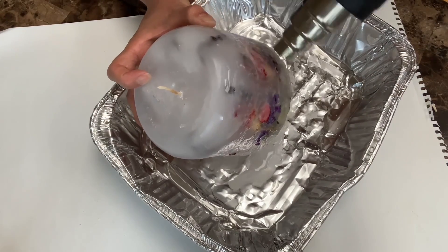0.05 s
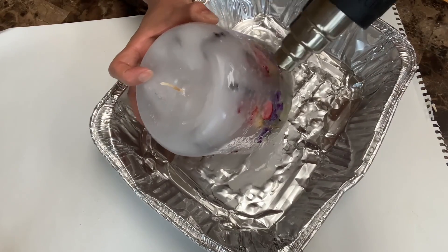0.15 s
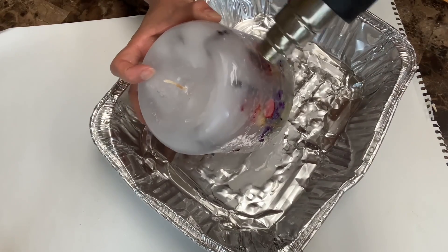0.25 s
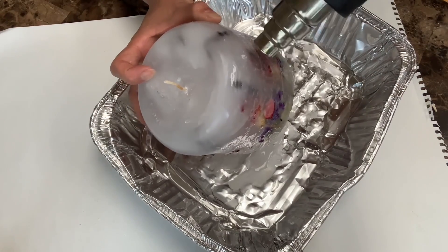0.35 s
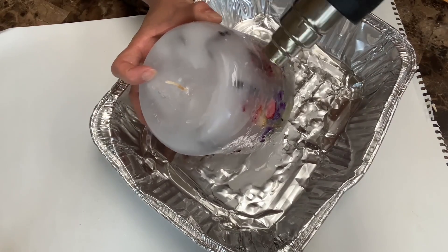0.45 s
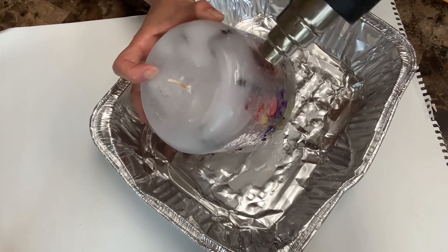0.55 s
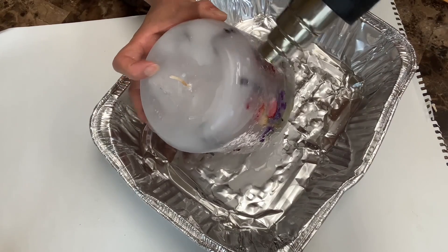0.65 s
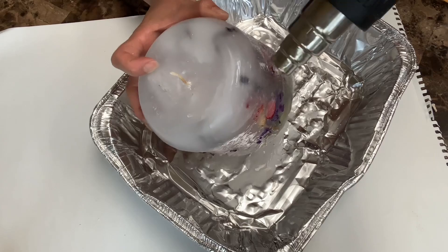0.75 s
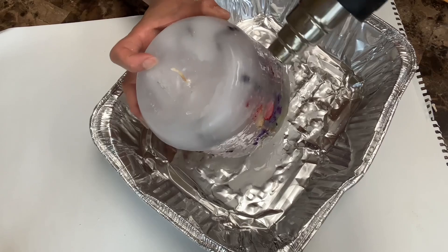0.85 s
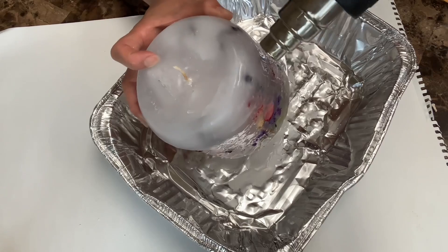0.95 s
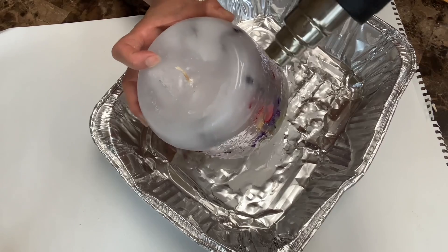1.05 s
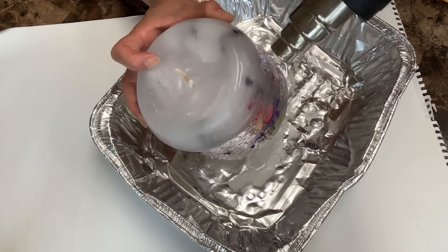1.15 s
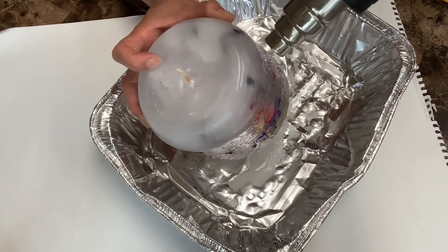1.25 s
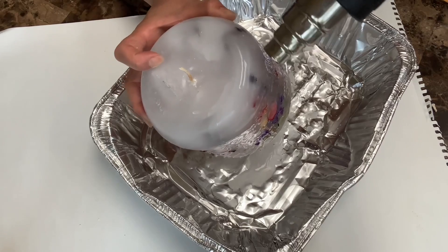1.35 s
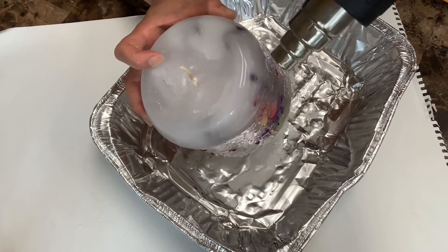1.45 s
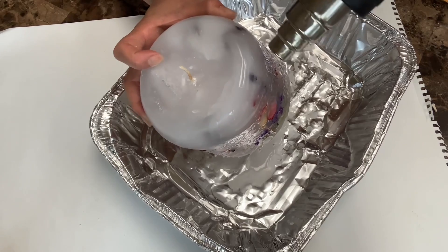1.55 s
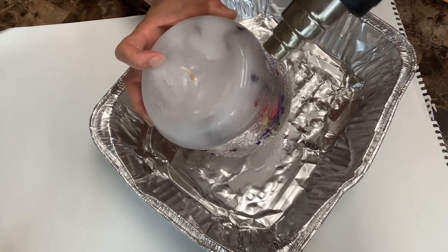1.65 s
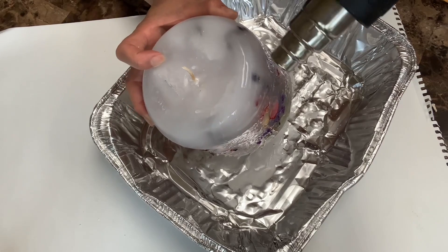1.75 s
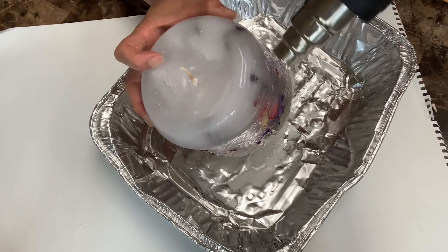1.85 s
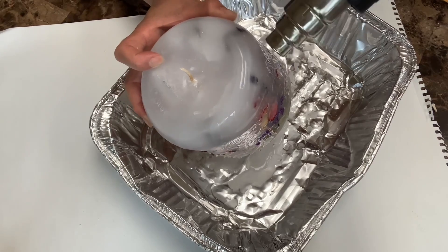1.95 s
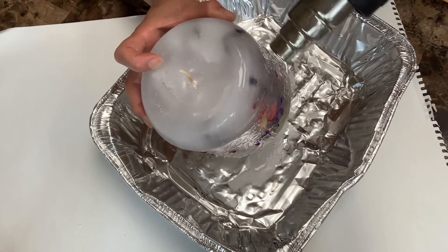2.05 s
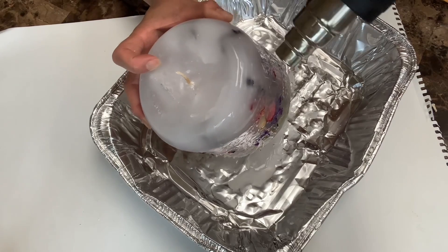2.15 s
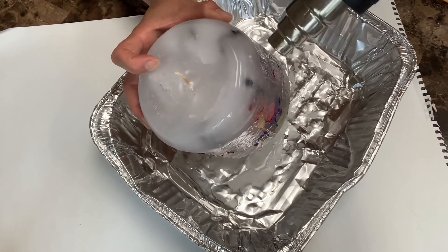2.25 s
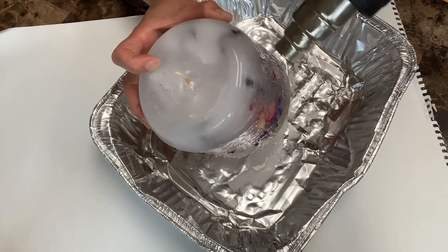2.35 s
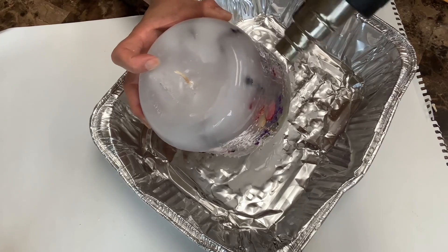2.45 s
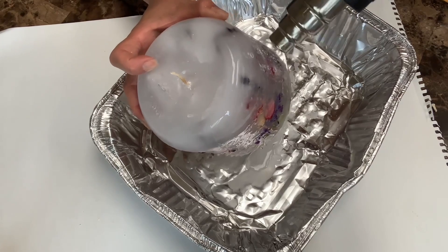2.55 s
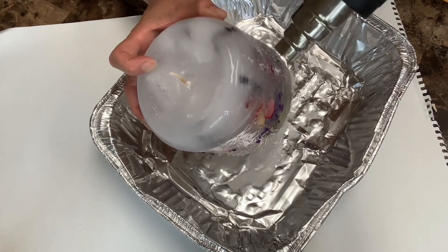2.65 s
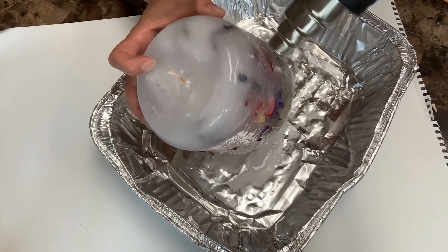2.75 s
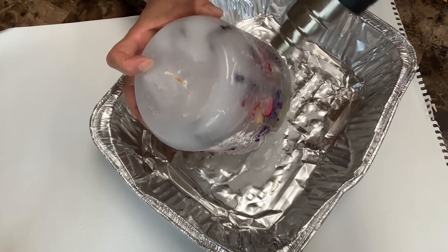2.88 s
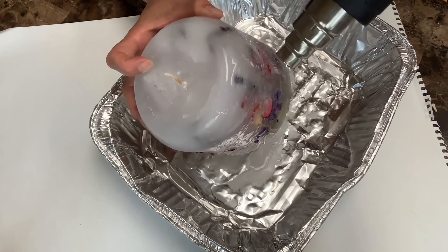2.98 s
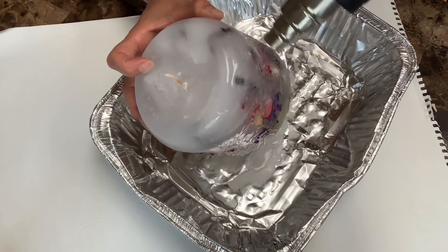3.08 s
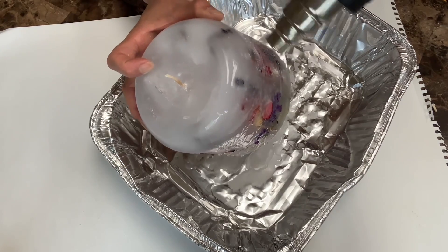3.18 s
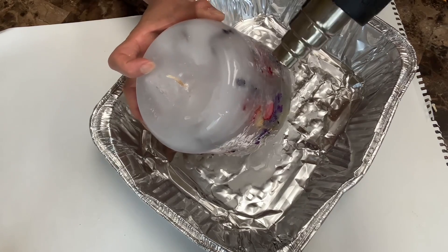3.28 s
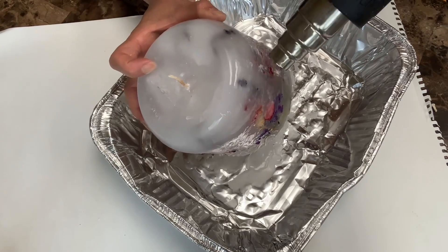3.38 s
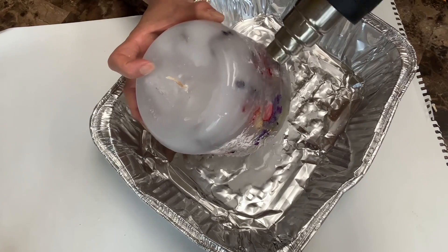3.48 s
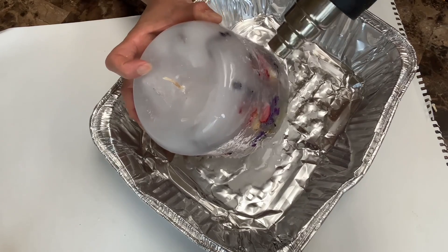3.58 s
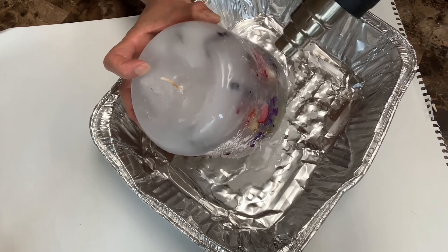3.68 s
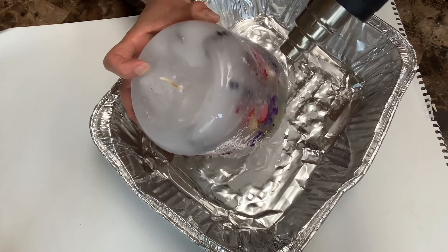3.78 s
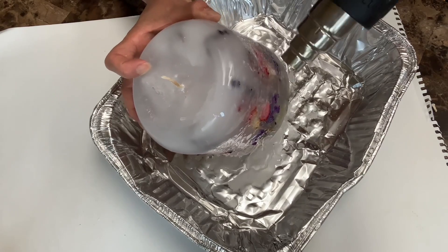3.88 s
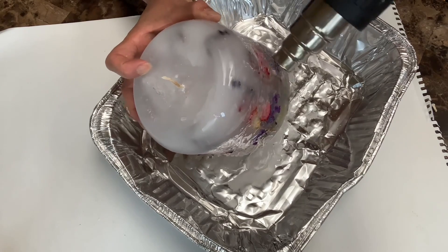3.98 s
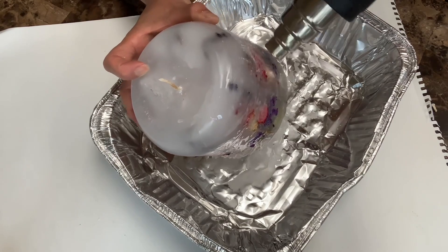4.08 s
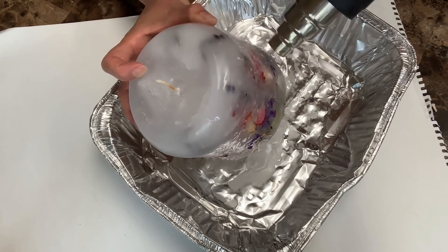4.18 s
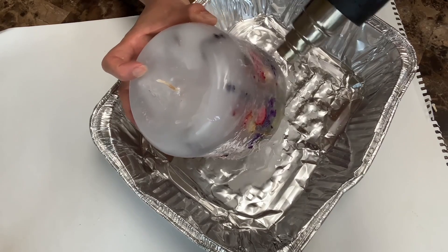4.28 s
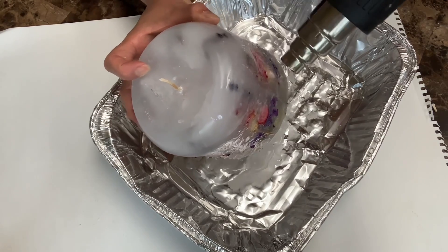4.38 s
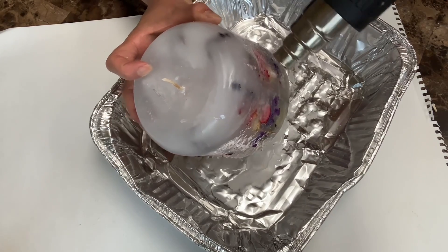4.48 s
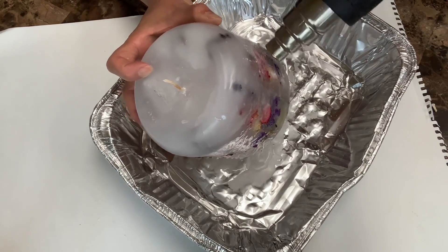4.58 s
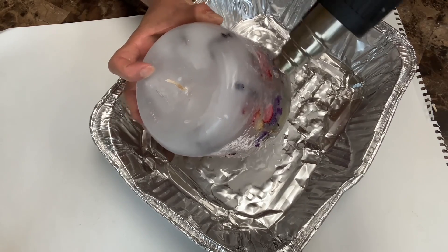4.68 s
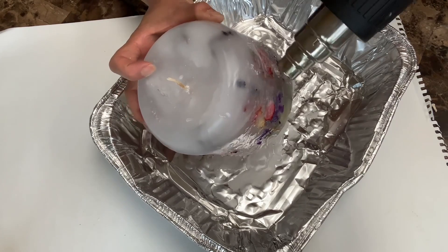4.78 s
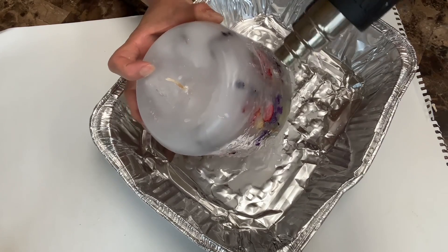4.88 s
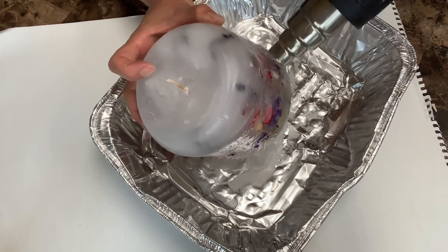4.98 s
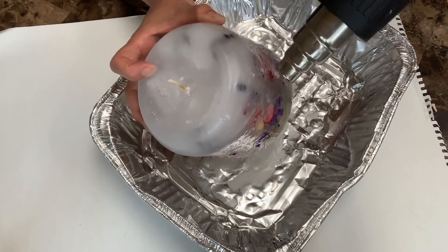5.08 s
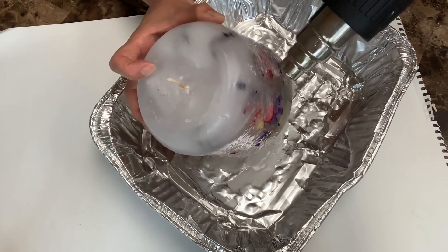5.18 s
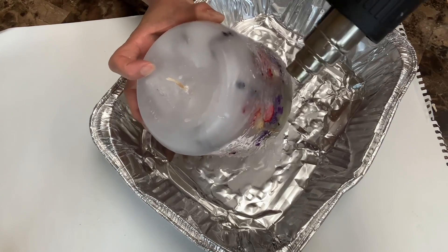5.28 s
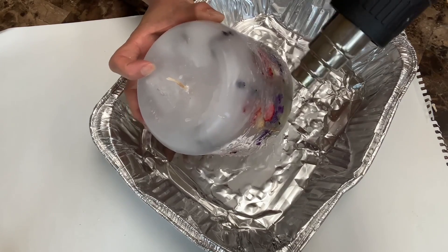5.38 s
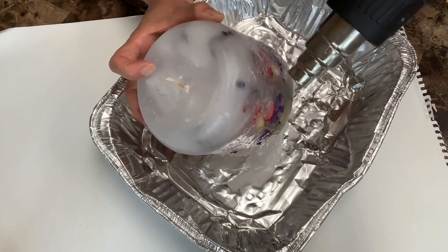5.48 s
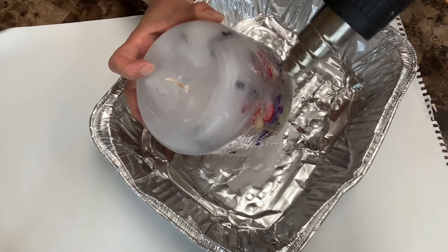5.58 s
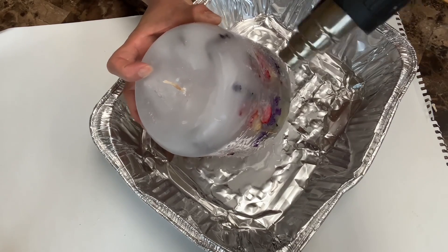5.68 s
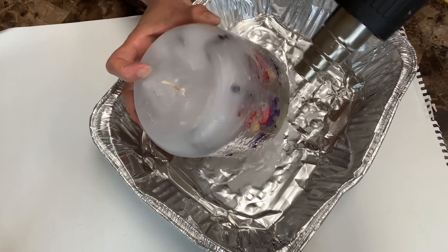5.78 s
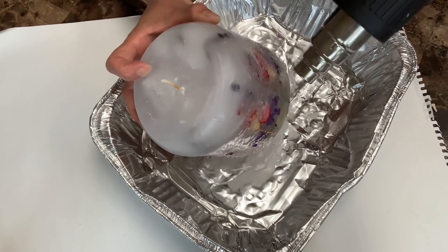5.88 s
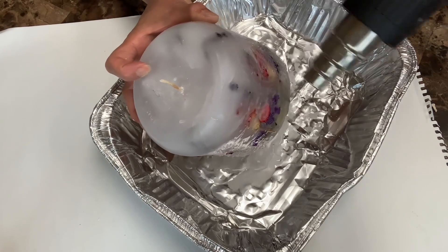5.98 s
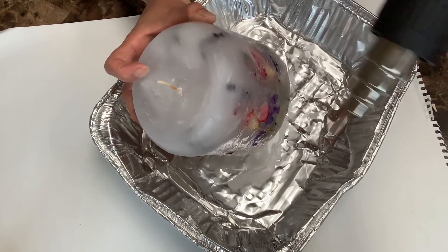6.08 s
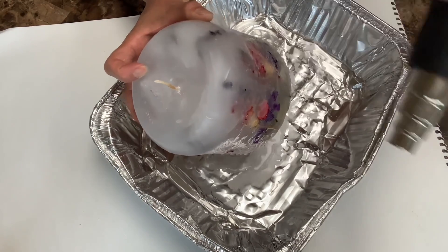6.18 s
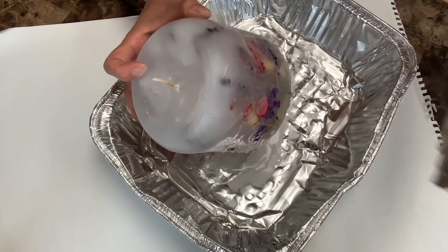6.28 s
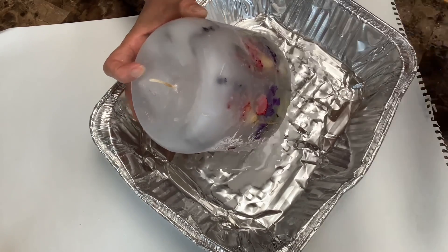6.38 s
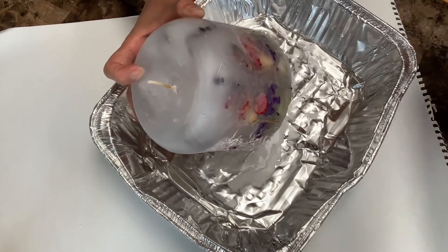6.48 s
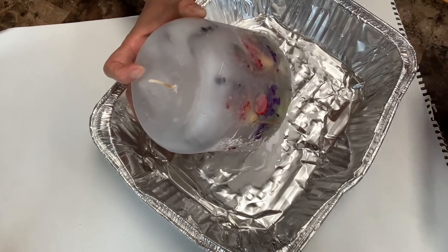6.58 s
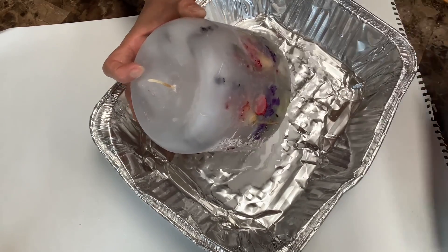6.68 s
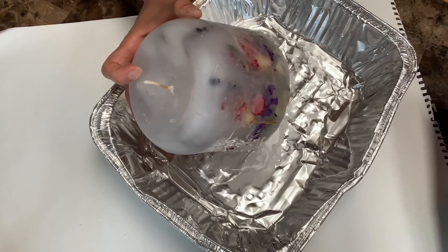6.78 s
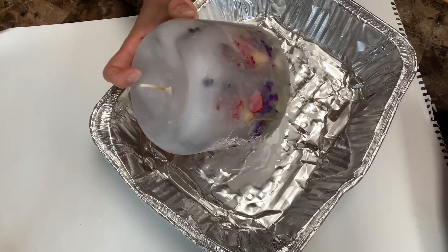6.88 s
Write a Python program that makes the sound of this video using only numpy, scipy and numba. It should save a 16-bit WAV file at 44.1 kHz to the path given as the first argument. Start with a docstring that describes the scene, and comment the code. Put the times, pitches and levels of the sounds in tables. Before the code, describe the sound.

A handheld heat gun runs close by in a quiet room, a steady rush of air with a motor hum and thin high whine. The tone of the rush shifts slightly as it is waved over a foil tray. After about five seconds the switch clicks off, and the fan coasts down with a falling, fading whine, growing quieter as the gun is moved aside.

```python
"""A heat gun's fan drives turbulent air through its barrel, waved at a candle over a foil tray.
Barrel resonances and the tray's echo colour the rush; the motor whines on harmonics of the shaft speed.
The switch clicks, drag slows the shaft and the gun is put aside with a faint rumble.
Low hums sound while the power is on; a quiet room lies behind. A phone listens half a metre away."""
import sys
import numpy as np
from scipy import signal
from scipy.fft import rfft, irfft
from scipy.io import wavfile
from scipy.ndimage import uniform_filter1d
from numba import njit

SR = 44100
rng = np.random.default_rng(int(sys.argv[2]) if len(sys.argv) > 2 else 0)


def dump(signal):
    """Clip the signal to [-1, 1] and save it as 16-bit WAV at the path in sys.argv[1]."""
    limited = np.clip(np.atleast_2d(signal).T, -1, 1)
    pcm = np.round(limited * 32767).astype(np.int16)
    wavfile.write(sys.argv[1], SR, pcm)


N = 305613
HOP = 128  # samples per control step
FULL_SPEED_HZ, TOP_HZ = 233.4, 15740


def undb(db):
    """Amplitude ratio of a level."""
    return 10 ** (np.asarray(db) / 20)


def curve(table, t, column=1):
    """Linear interpolation in time."""
    rows = np.array(table, float)
    return np.interp(t, rows[:, 0], rows[:, column])


def on_log(table, hz, column=1):
    """Interpolation in log frequency."""
    rows = np.array(table, float)
    return np.interp(np.log(np.maximum(hz, 1)), np.log(rows[:, 0]), rows[:, column])


def peak(hz, centre, width):
    """Lorentzian resonance curve; width is taken at half height."""
    return 1 / (1 + (2 * (hz - centre) / width) ** 2)


def walk(rows, steps, rate_hz):
    """Smoothed Gaussian noise of unit spread, one value per control step."""
    size = max(int(SR / HOP / rate_hz), 1)
    slow = rng.standard_normal((rows, steps + 4 * size))
    slow = uniform_filter1d(uniform_filter1d(slow, size), size)
    return slow[:, 2 * size:2 * size + steps] * np.sqrt(1.5 * size)


def coloured(gain_db):
    """Time-varying filtering of two independent noises by gain_db(hz, t)."""
    frames = dict(fs=SR, nperseg=8 * HOP, noverlap=6 * HOP)
    hz, t, spectra = signal.stft(rng.standard_normal((2, N)), **frames)
    return signal.istft(spectra * undb(gain_db(hz[:, None], t)), **frames)[1][:, :N]


@njit
def harmonic_sum(angle, amplitude, count, hop):
    """Fourier series in the shaft angle; complex amplitudes glide between control steps."""
    out = np.zeros((2, len(angle)))
    for i in range(len(angle)):
        step, u = i // hop, (i % hop) / hop
        turn = np.exp(1j * angle[i])
        phasor = turn
        for k in range(count[step]):
            for c in range(2):
                blend = amplitude[c, step, k] * (1 - u) + amplitude[c, step + 1, k] * u
                out[c, i] += (blend * phasor).imag
            phasor *= turn
    return out


# Shaft rotation under power: t/s, f/Hz
POWERED_SPEED = [(0, 232.8), (.36, 232.8), (.69, 233.7), (.9, 233.3), (2.04, 233.4), (2.6, 232.9),
                 (3.45, 233.8), (3.99, 233.8), (4.14, 232.9), (4.63, 234.2), (5.405, 233.8)]
OFF_S = POWERED_SPEED[-1][0]

def speed(t, step_s=.005):
    """Shaft rate in Hz: held by the motor, then slowed by dry friction, viscous oil and air drag."""
    rows = list(POWERED_SPEED)
    while rows[-1][0] < N / SR + .1:
        at, hz = rows[-1]
        drag = 49.7 + .4565 * hz + .002144 * hz ** 2
        rows.append((at + step_s, hz - step_s * drag))
    return curve(rows, t)


def away_db(t, at_s=6.45, takes_s=.11):
    """Level falls with distance as the gun is put aside."""
    return -7.5 * np.clip((t - at_s) / takes_s + .5, 0, 1)


# Turbulence spectrum at full speed: f/Hz, relative level/dB
RUSH_SPECTRUM = [(30, -27), (100, -6), (400, -5.5), (800, 7), (1500, 6), (2500, 2), (4000, -1.5),
                 (6000, -8.5), (7000, -12.5), (9000, -17), (11000, -10), (13000, -25), (15500, -33)]
# Barrel resonances: f/Hz, width/Hz, gain/dB
BARREL_MODES = [(129, 420, 3.5), (560.3, 5.6, 7), (646, 30, 2), (755, 68.5, 12.5), (857, 35, 1),
                (893, 55, 7), (1490, 43, 8), (1720, 5.6, 9), (2110, 93, 5.5)]
# Colour set by the aim: t/s, 4 kHz jet hiss/dB, 1.5 kHz ring/dB, 2.1 kHz ring/dB
AIM_COLOUR = [(0, 0.5, 1.5, 1), (.5, -0.5, 0.5, 5.5), (.9, -0.5, -0.5, 4), (1.5, 0, 0.5, 5.5),
              (2.4, -0.5, 1, 0.5), (3.1, -1.5, 2, 0.5), (3.5, -1, 0.5, 2.5), (3.75, 1, 3, -1.5),
              (4.0, -0.5, -1, 7), (4.15, -2, 3, 2), (4.3, 1, 1.5, -0.5), (4.55, 0, 1, 3.5),
              (4.8, -0.5, -1, 4), (5.35, 0.5, 3, 1), (5.8, 3.5, 4.5, 3.5), (6.15, 4.5, 4, 7),
              (6.4, 13, 6, -4), (6.6, 27, 6, 5), (6.93, 26, -2, 0)]
# Destructive interference with the tray's echo: t/s, lower f/Hz, depth/dB, upper f/Hz, depth/dB
TRAY_NOTCHES = [(0, 1920, -1, 2620, -1.5), (.7, 1900, 11, 2300, 6.5), (2.2, 1840, 2, 2260, 5.5),
                (2.6, 1890, 10, 2630, 0), (3.3, 1930, 6, 2700, 2), (3.8, 2080, 20, 2780, 7),
                (4.6, 2050, 12, 2840, 3), (5.2, 2000, 7, 2780, 1.5), (5.7, 1890, 6, 2780, -1)]
# Bands that fade more slowly: f/Hz, width/Hz, level spared/(dB per decade of speed)
LINGERING_BANDS = [(1020, 190, 15), (5140, 1350, 24)]

def rush(gain_db=-32, db_per_decade=47.5, darken_db=5., flicker_db=1.2, patch_db=2.4):
    """Turbulent noise filtered by the barrel; it follows a power law of fan speed, treble fading first."""
    def colour(hz, t):
        ratio = speed(t) / FULL_SPEED_HZ
        db = on_log(RUSH_SPECTRUM, hz) + sum(g * peak(hz, f, w) for f, w, g in BARREL_MODES)
        db = db + darken_db * np.log2(np.clip(hz, 300, 5000) / 900) * np.log2(ratio)
        db += curve(AIM_COLOUR, t) * np.exp(-np.log2(np.maximum(hz, 1) / 4000) ** 2)
        db += curve(AIM_COLOUR, t, 2) * peak(hz, 1500, width=500)
        db += curve(AIM_COLOUR, t, 3) * peak(hz, 2100, width=400)
        for column, width_hz in ((1, 90), (3, 230)):
            notch = peak(hz, curve(TRAY_NOTCHES, t, column), width_hz)
            db -= curve(TRAY_NOTCHES, t, column + 1) * notch
        spared = sum(g * peak(hz, f, w) for f, w, g in LINGERING_BANDS)
        db += (db_per_decade - spared) * np.log10(ratio)
        # neighbouring third-octaves swell together as the jet moves over the tray
        third = (3 * np.log2(np.maximum(hz[:, 0], 20) / 20)).astype(int)
        db += flicker_db * uniform_filter1d(walk(third.max() + 1, len(t), 7), size=2, axis=0)[third]
        # narrow patches of the treble swell and fade
        patch = (hz[:, 0] / 170).astype(int)
        db += patch_db * np.clip(hz / 2500 - .5, 0, 1) * walk(patch.max() + 1, len(t), 8)[patch]
        return db + gain_db + away_db(t)
    return coloured(colour)


# Spectral envelope of the housing: f/Hz, level/dB
HOUSING_SPECTRUM = [(200, -85), (800, -63), (1500, -66), (3000, -71), (5500, -77), (6200, -64), (6600, -59),
                    (7000, -57), (7400, -59), (7700, -63), (8500, -62), (9800, -58), (10700, -57),
                    (12000, -61), (14000, -65), (16000, -72)]
# Motor and blade tones at full speed: harmonic number, level/dB
SHAFT_HARMONICS = [(1, -49), (4, -58), (8, -59), (12, -57), (13, -57), (16, -62), (17, -65), (20, -60),
                   (23, -69), (25, -70), (27, -60), (29, -63), (32, -62), (33, -52), (34, -61), (35, -54),
                   (36, -61), (37, -61), (38, -54), (39, -57), (40, -61), (41, -58), (42, -55), (43, -58),
                   (44, -54), (45, -56), (46, -58), (47, -60), (48, -54), (49, -63), (50, -61), (51, -58),
                   (52, -53), (53, -57), (54, -61), (55, -60), (56, -61), (57, -64), (58, -57), (59, -61),
                   (60, -56), (61, -63), (62, -68), (63, -69), (64, -67), (65, -65), (66, -67), (67, -68)]
# Tones that vary with the aim: {harmonic number: (t/s, level/dB)}
AIMED_HARMONICS = {5: [(0, -45), (1.1, -46), (1.75, -47.5), (2.95, -44), (3.4, -47), (4.1, -43), (4.7, -51),
                   (5.4, -48)], 14: [(0, -52), (1.0, -51), (2.1, -50.5), (3.5, -56.5), (4.4, -55.5),
                   (5.4, -53.5)], 18: [(0, -47.5), (1.36, -48), (2.25, -49.5), (2.65, -47.5), (3.5, -51.5),
                   (4.0, -57), (4.28, -46), (4.55, -56), (4.7, -48), (4.95, -54), (5.12, -51), (5.4, -58)],
                   28: [(0, -59), (2.3, -71), (2.7, -53.5), (3.4, -48), (3.8, -63), (5.4, -60)],
                   31: [(0, -53.5), (2.5, -53.5), (4.1, -56), (4.4, -50), (4.6, -55), (4.9, -54),
                   (5.4, -55)], 30: [(0, -40), (.17, -58), (.46, -45.5), (1.0, -65), (2.0, -80), (2.3, -51),
                   (2.46, -57), (2.57, -41.5), (3.1, -50), (3.46, -59), (3.58, -47), (3.95, -58),
                   (4.28, -47.5), (4.45, -58), (4.6, -44), (5.0, -59), (5.4, -47.5)]}
# Blade tones while coasting: harmonic number, lift before weighting/dB
COASTING_TONES = [(5, 3), (7, 5), (10, 14), (11, 7), (12, 7), (14, 7), (15, 16), (17, 4), (19, 7), (20, 17),
                  (21, 5), (24, 3), (25, 12), (28, 5), (30, 12), (35, 11), (39, 5)]
# Barrel resonances that those tones sweep through: f/Hz, weight of the lift
BARREL_WEIGHT = [(500, .2), (660, .6), (790, 1.3), (950, 1.15), (1050, .8), (1150, 1.15), (1300, .7),
                 (1480, 1.05), (1700, .4), (2060, 1.05), (2280, .4), (2420, .6), (2520, 1.2), (2650, 1.3),
                 (2800, .4), (3100, 1.3), (3250, .95), (3380, 1.1), (3600, .5), (4200, 1.05), (4700, .3),
                 (5750, .8), (6400, 0)]
# Flares of the squeal while coasting: t/s, gain/dB
SQUEAL_GAIN = [(5.41, 13), (5.47, 0), (5.56, 0), (5.6, -3), (5.66, -2), (5.72, -3), (5.8, 2), (5.9, -4),
               (5.97, -2), (6.06, 5), (6.12, -3), (6.17, 1.5), (6.28, -4), (6.45, 0), (6.6, 1), (6.93, -5)]

def whine(gain_db=.24, fade_db=1.9, flutter_db=3., scatter_db=2., ripple_db=-27, count=480):
    """Periodic forcing: brushes, blades and unbalance repeat each turn, giving harmonics of the shaft."""
    steps = np.arange(N // HOP + 2) * HOP / SR
    def wander(rate_hz, columns=count):
        return walk(columns, len(steps), rate_hz).T

    k = np.arange(1, count + 1)
    shaft_hz = speed(steps)[:, None]
    hz, ratio = shaft_hz * k, shaft_hz / FULL_SPEED_HZ
    housing_db = on_log(HOUSING_SPECTRUM, k * FULL_SPEED_HZ)
    tone_db = np.tile(housing_db + scatter_db * rng.standard_normal(count), (len(steps), 1))
    for order, db in SHAFT_HARMONICS:
        tone_db[:, order - 1] = db
    for order, levels in AIMED_HARMONICS.items():
        tone_db[:, order - 1] = curve(levels, steps)

    # load lifts single harmonics; coasting, they sink to the envelope and blade tones stand out
    loaded = np.minimum(ratio, 1) ** np.clip(k, 2, 40)
    coasting = 1 - loaded
    lift_db = (tone_db - housing_db) * loaded
    waver_db = fade_db * wander(3.6) * loaded + flutter_db * wander(45)
    for (order, db), patch_db in zip(COASTING_TONES, 2 * wander(16, len(COASTING_TONES)).T):
        blade_hz = hz[:, order - 1]
        spared_db = -11 * np.log10(ratio[:, 0]) / (1 + (blade_hz / 1700) ** 4)  # low tones linger
        weight = coasting[:, -1] * on_log(BARREL_WEIGHT, blade_hz)
        lift_db[:, order - 1] += (db + patch_db + spared_db) * weight

    # short waves change most with the aim
    restless = np.clip((ratio * k / 30) ** np.where(ratio > .98, 1.2, 2), .15, 1)
    db = on_log(HOUSING_SPECTRUM, hz) + lift_db + restless * waver_db
    db += coasting * restless  # up to 1 dB more treble while coasting
    squeal = peak(hz, 6500, width=2100)
    db += (38 - 17.5 * squeal) * np.log10(ratio)  # the squeal band dies away more slowly
    db += coasting * (squeal * curve(SQUEAL_GAIN, steps)[:, None] + 3.5 * peak(hz, 6890, width=300))
    db += gain_db + away_db(steps)[:, None]

    phase = 2 * np.pi * rng.random(count)
    phase = phase + (1.6 * (1 - .75 * squeal) * coasting + .6 * loaded) * restless * wander(40)
    phase += 1.5 * coasting * (1 - .8 * squeal) * restless ** 2 * wander(170)  # treble blurs to hiss
    amplitude = np.sqrt(2) * undb(db) * np.exp(1j * phase)
    # a second path flips sign with the aim, in quadrature above harmonic 30
    side = np.where(k > 30, 1j, 1) * np.sqrt(restless) * np.tanh(2 * wander(2))
    side *= np.exp(2j * coasting * wander(100))

    t = np.arange(N) / SR
    jitter_hz = .08 * np.interp(t, steps, wander(6, 1)[:, 0])
    angle = 2 * np.pi * np.cumsum(speed(t) + jitter_hz) / SR
    in_band = np.minimum(TOP_HZ // shaft_hz[:, 0], count).astype(np.int64)
    # rectified mains pulls the motor twice a cycle
    ripple = 1 + undb(ripple_db) * np.sin(2 * np.pi * 120 * t) * (t < OFF_S)
    return harmonic_sum(angle, np.array([amplitude, amplitude * side]), in_band, HOP) * ripple


# Faint wavering hum: f/Hz, starting level/dB, rise/(dB/s)
FAINT_HUMS = [(322.7, -68, 1.0)]
# Mains hum: t/s, level/dB
MAINS_LEVEL = [(0.0, -67), (0.54, -65), (0.59, -59), (2.38, -66.5), (3.19, -54.5), (3.23, -69), (3.47, -58),
               (3.7, -67), (3.92, -56), (4.42, -67), (4.65, -60), (4.96, -71), (5.01, -62), (5.4, -63.5)]

def hums(mains_hz=119.4, waver_db=3.):
    """Slowly modulated sinusoids: mains hum and a fainter tone, both ending with the power."""
    t = np.arange(N) / SR
    waver = np.repeat(walk(len(FAINT_HUMS) + 1, N // HOP + 1, 8), HOP, axis=1)[:, :N]
    tones = undb(curve(MAINS_LEVEL, t) + waver[-1]) * np.sin(2 * np.pi * mains_hz * t)
    for (hz, db, rise), drift in zip(FAINT_HUMS, waver):
        tones += undb(db + rise * t + waver_db * drift) * np.sin(2 * np.pi * hz * t + drift)
    powered = np.clip((OFF_S - t) / .03 + 1, 0, 1)
    return np.array([np.sqrt(2) * tones * powered, np.zeros(N)])  # mid signal only


# Background spectrum: f/Hz, relative level/dB
ROOM_SPECTRUM = [(25, -20), (60, -21), (120, -19), (400, -27), (800, -22), (1600, -35), (3000, -38),
                 (5000, -33), (7000, -32), (15500, -67)]

def room(level_db=-67):
    """Stationary noise of distant appliances and ventilation."""
    air = coloured(lambda hz, t: on_log(ROOM_SPECTRUM, hz))
    return air * undb(level_db) / air.std()


# Blows of the rocker: t/s, gain/dB
SWITCH_BLOWS = [(5.4058, -22), (5.4068, -26), (5.4079, -15)]
# Modes of the plastic housing: f/Hz, relative level/dB, T60/s
PLASTIC_MODES = [(1500, -6, .016), (2050, -11, .014), (3100, -4, .011), (4450, 0.5, .013), (5500, -8, .006),
                 (7700, -12, .005), (12000, -11, .005), (15300, -10, .005)]

def switch(rise_s=.0006, crack_db=-3, crack_t60_s=.011):
    """Impact excitation: each blow of the rocker gives a dry crack and rings damped housing modes."""
    t = np.arange(int(.1 * SR)) / SR
    band = signal.butter(1, [2000, 9000], "bandpass", fs=SR, output="sos")
    out = np.zeros((2, N))
    for at, db in SWITCH_BLOWS:
        phases = 2 * np.pi * rng.random((len(PLASTIC_MODES), 2, 1))
        ring = sum(undb(g) * np.sin(2 * np.pi * hz * t + phase) * 1000. ** (-t / t60)
                   for (hz, g, t60), phase in zip(PLASTIC_MODES, phases))
        crack = signal.sosfilt(band, rng.standard_normal((2, len(t))))
        crack *= undb(crack_db) * 1000. ** (-t / crack_t60_s)
        start = int(at * SR)
        out[:, start:start + len(t)] += undb(db) * (ring + crack) * (1 - np.exp(-t / rise_s))
    return out


def rumble(peak_s=6.85, swell_s=.24, level_db=-72):
    """Low band-limited noise under a Gaussian envelope as the gun is laid down."""
    t = np.arange(N) / SR
    band = signal.butter(2, [40, 150], "bandpass", fs=SR, output="sos")
    low = signal.sosfilt(band, rng.standard_normal((2, N)))
    return low / low.std() * undb(level_db) * np.exp(-((t - peak_s) / swell_s) ** 2)


# Stereo image: f/Hz, left-right likeness, left phase lead/rad, left minus right level/dB
STEREO_IMAGE = [(30, .7, 0, -2.5), (200, .92, .1, -5.5), (700, .88, .3, -7), (1200, .75, -.3, -1.5),
                (2300, .7, .1, 1), (2700, .55, 1.5, 1), (3300, .55, .7, 1), (3800, .4, 2.2, 1),
                (4700, .6, 1.6, 1), (5900, .55, 3.1, .3), (6600, .3, 4.5, 0), (7600, .62, 3.4, 0),
                (8400, .92, 3.14, 0), (9700, .9, 3.0, 0), (11000, .8, 2.2, 0), (12200, .8, 1.0, 0),
                (13100, .99, 0, 0), (16000, .97, 0, 0)]

def scene():
    """Superposition in mid and side, spread by frequency: the treble is wide, the very top centred."""
    mid, side = rfft(rush() + whine() + hums() + switch() + room() + rumble(), 2 * N)
    hz = np.arange(len(mid)) * SR / (2 * N)
    likeness, lead, pan_db = (on_log(STEREO_IMAGE, hz, column) for column in (1, 2, 3))
    mid *= np.sqrt((1 + likeness) / 2)
    side *= np.sqrt((1 - likeness) / 2)
    gain = np.sqrt(2 / (1 + undb(2 * pan_db)))
    left = (mid + side) * gain * undb(pan_db) * np.exp(.5j * lead)
    right = (mid - side) * gain * np.exp(-.5j * lead)
    return irfft(np.array([left, right]), 2 * N)[:, :N]


def record(dry):
    """Band limiting: the phone cuts the top treble steeply."""
    return signal.sosfilt(signal.ellip(12, .3, 80, TOP_HZ, fs=SR, output="sos"), dry)


dry = scene()
out = record(dry)
dump(out)
```